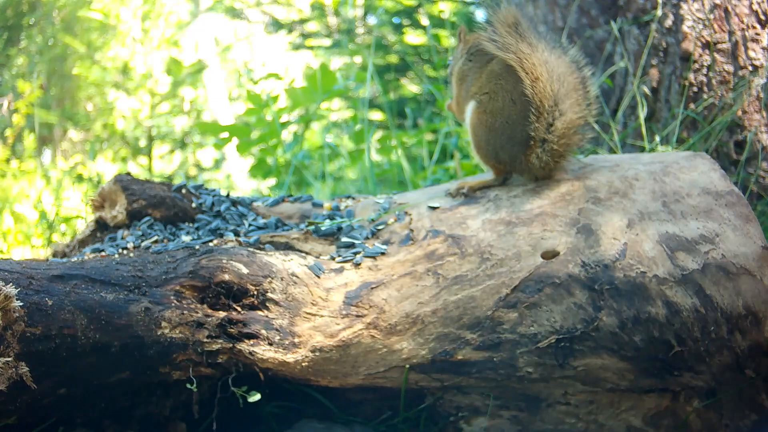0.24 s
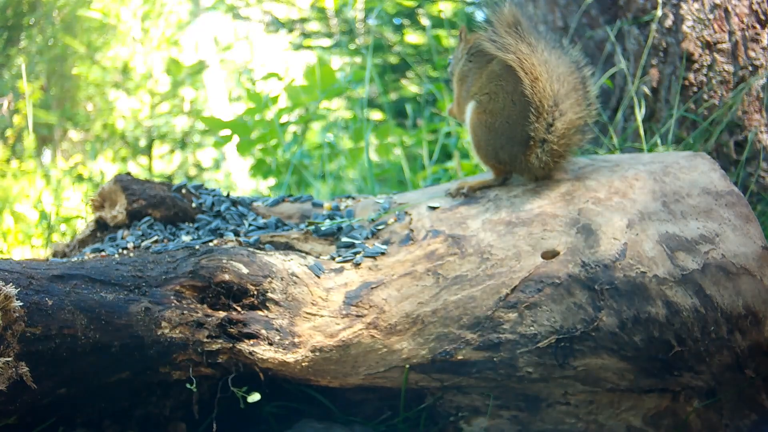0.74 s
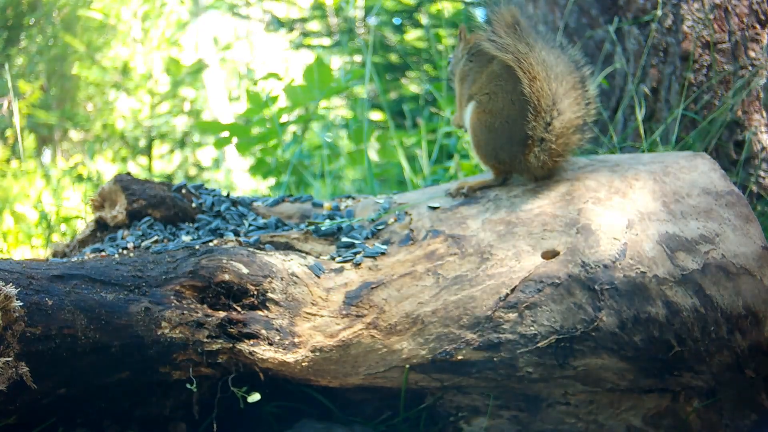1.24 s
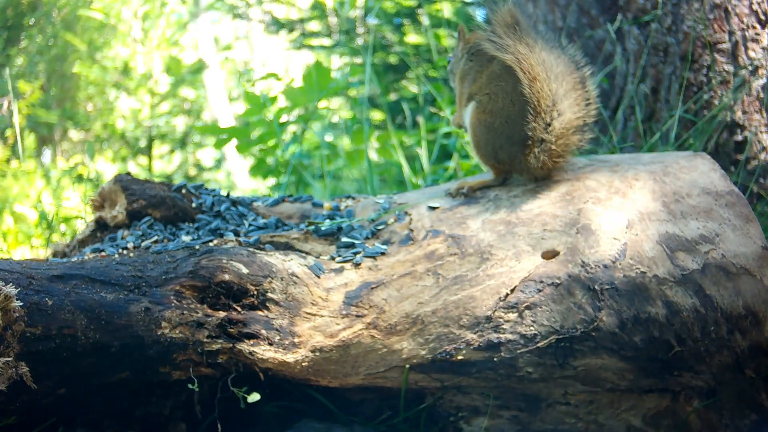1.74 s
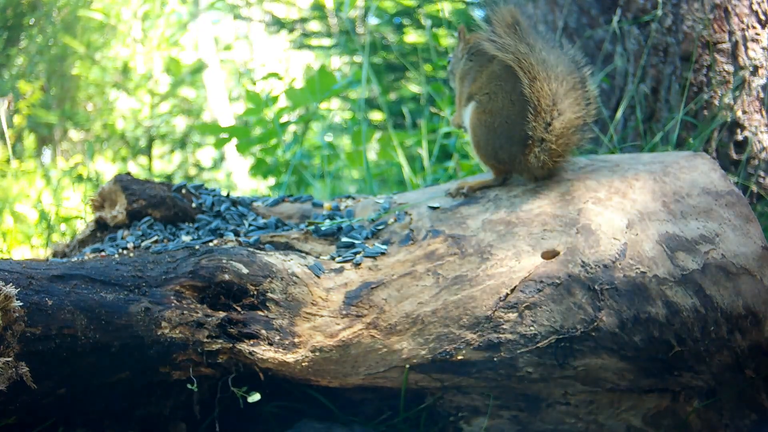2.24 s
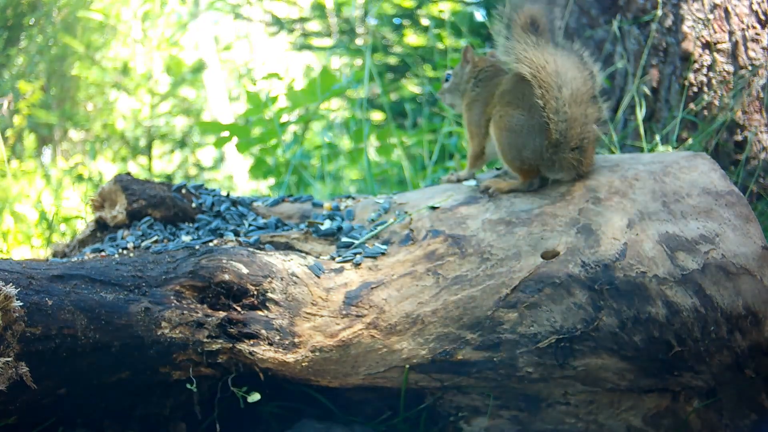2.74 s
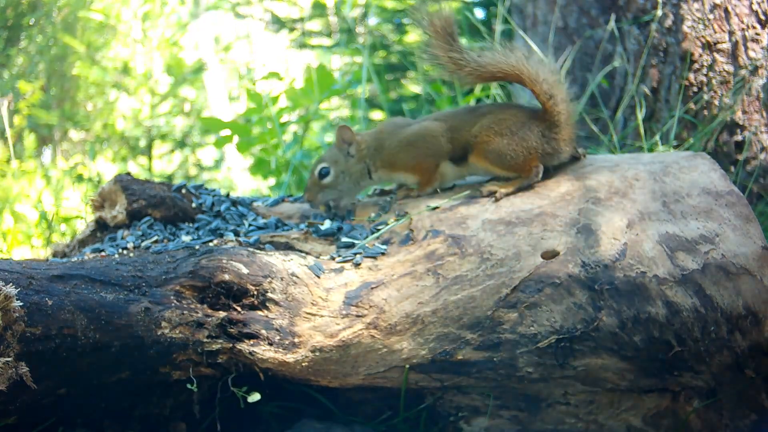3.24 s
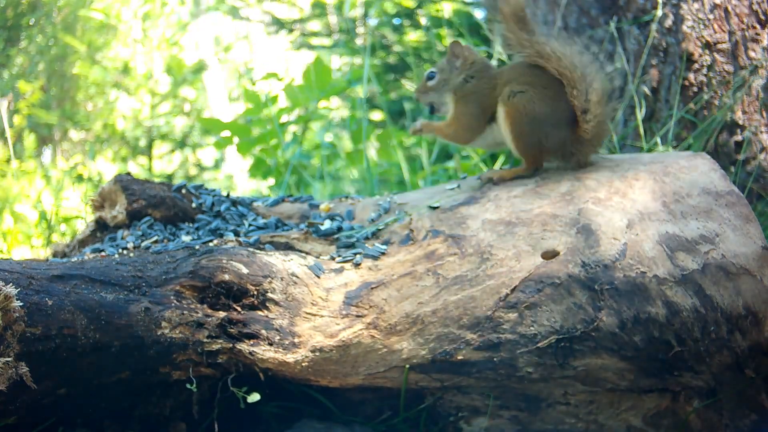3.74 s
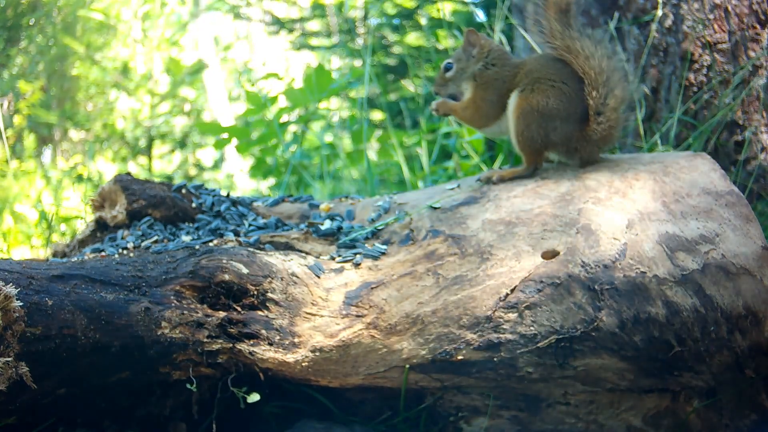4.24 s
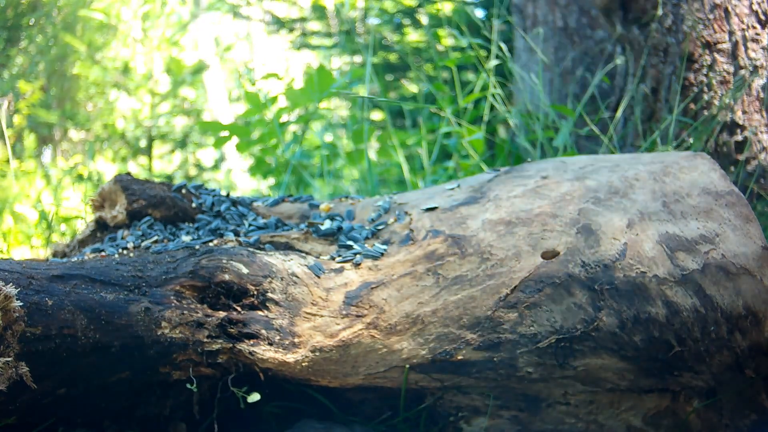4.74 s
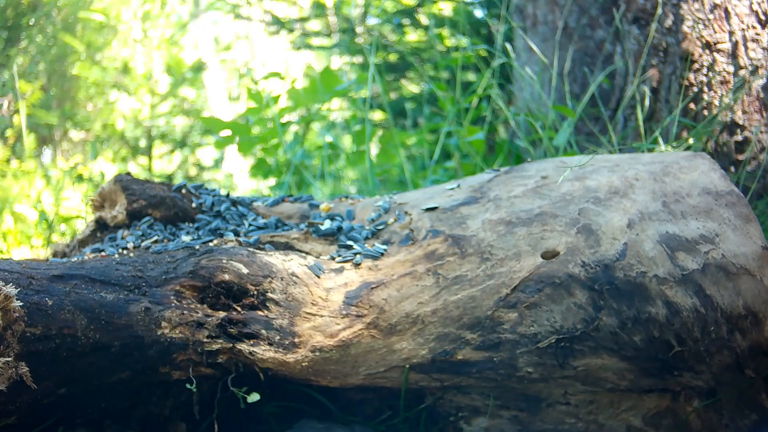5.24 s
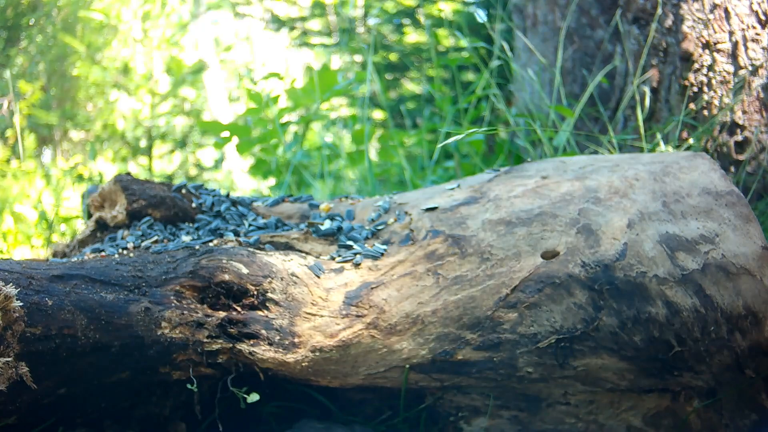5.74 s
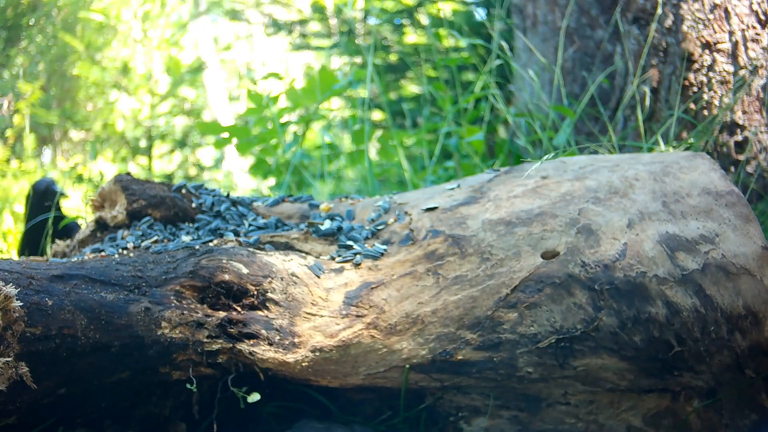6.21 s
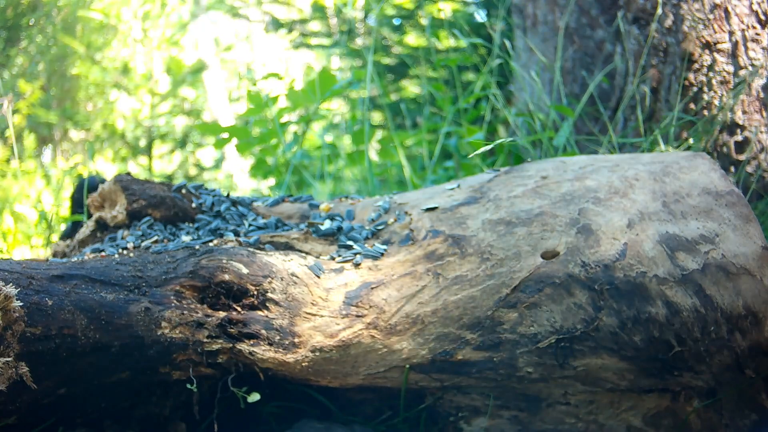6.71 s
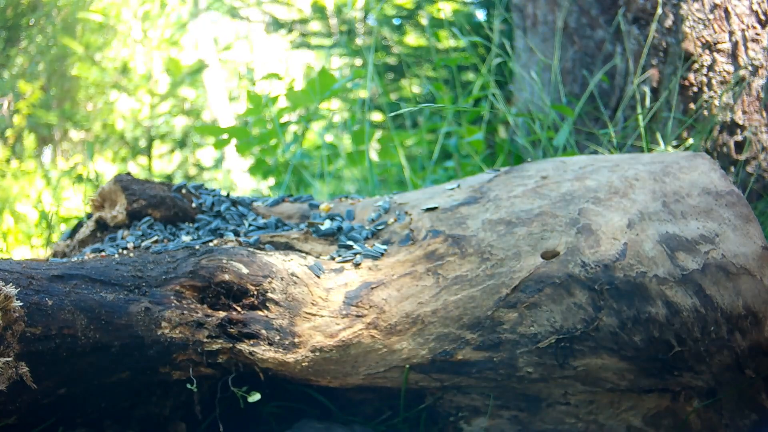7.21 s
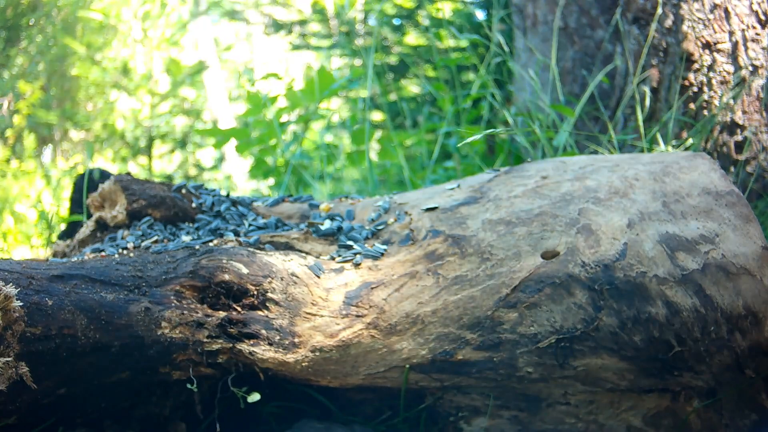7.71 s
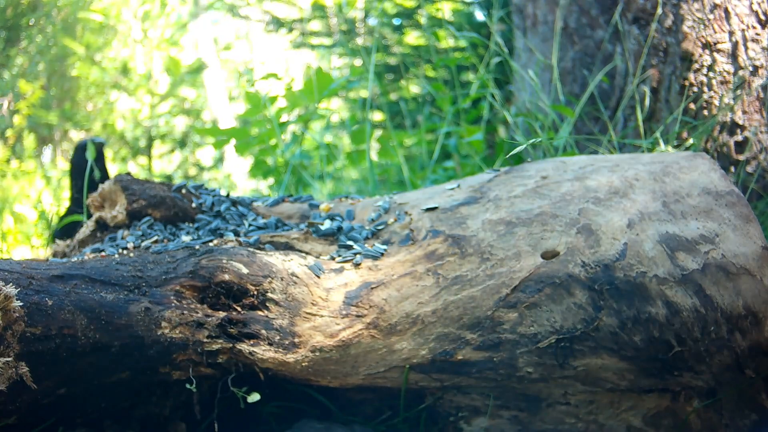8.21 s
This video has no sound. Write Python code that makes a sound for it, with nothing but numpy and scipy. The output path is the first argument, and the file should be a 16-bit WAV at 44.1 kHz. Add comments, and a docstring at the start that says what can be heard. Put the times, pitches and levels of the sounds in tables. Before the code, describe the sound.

A soft, slowly sinking wash of air in a wooded garden. From 0 to 1.8 s thin, very high bird whistles sound deep in the trees, while a young crow begs faintly with whining, arching cries at 0, 0.8 and 1.9 s, echoing in the wood. At 2.5 s a close crow gives a loud, clear, lower caw lasting half a second. Another faint begging cry at 3.0 s and a short rising squeak at 3.2 s lead straight into six harsh, fluttering, raspy caws at about 3.3, 4.1, 4.8, 5.4, 6.2 and 7.2 s, each sagging in pitch, the last softer. Between them, around 4.6 to 6.1 s, small birds peep and chip; husks tick near 4.7 s. A begging cry returns at 6.0 s. Loud peaks crackle at the microphone, with faint tree echo. After 7.7 s only quiet air remains, with one tiny tick at 8.3 s.

```python
"""In a wooded garden with a soft wash of air, small birds call thinly and a young crow begs further off.
Then a crow close by gives a clear caw, a short squeak and six harsh caws, with a faint echo from the trees.
Its voice is a train of pulses from the syrinx, the bird's voice box, shaped by throat, mouth and beak.
The harsh caws flutter about 59 times a second; a second side at half the pitch makes them rasp.
Between them birds peep and chip and seed husks tick; the strongest peaks overload the microphone."""
import sys
import numpy as np
from scipy import signal
from scipy.fft import rfft, irfft
from scipy.io import wavfile
from scipy.ndimage import uniform_filter1d

SR = 44100
rng = np.random.default_rng(int(sys.argv[2]) if len(sys.argv) > 2 else 0)


def dump(signal):
    """Clip the signal to [-1, 1] and save it as 16-bit WAV at the path in sys.argv[1]."""
    limited = np.clip(np.atleast_2d(signal).T, -1, 1)
    pcm = np.round(limited * 32767).astype(np.int16)
    wavfile.write(sys.argv[1], SR, pcm)


N = 373086
TIME = np.arange(N) / SR


def from_db(db):
    """Turn decibels into a gain."""
    return 10 ** (np.asarray(db) / 20)


def rms_one(x):
    """Scale a sound to an average (rms) level of 1."""
    return x / np.sqrt(np.mean(x ** 2) + 1e-20)


def even(x, size=800):
    """Hold the running level near 1, averaging over about size samples."""
    power = uniform_filter1d(uniform_filter1d(x ** 2, size), size // 2)
    return x / np.sqrt(power + 1e-14)


def read(rows, t):
    """Read the columns of a curve at times t, with straight lines between its points."""
    s, *columns = np.transpose(rows)
    return [np.interp(t, s, c) for c in columns]


def span(rows):
    """Sample times from the first row of a curve to its last."""
    return TIME[(TIME >= rows[0][0]) & (TIME <= rows[-1][0])]


def clocks(start, end):
    """A call's sample times, the time since its start, the time left and the share gone by."""
    t = span([(start,), (end,)])
    return t, t - t[0], t[-1] - t, np.linspace(0, 1, len(t))


def add(out, t, x):
    """Mix a sound in at its times, with its ends softened over 2 ms."""
    edge = np.clip(np.minimum(t - t[0], t[-1] - t) / .002, 0, 1)
    out[np.round(t * SR).astype(int)] += x * edge


def drift(rate, t):
    """Wander by chance, heading for a new random value (spread 1) rate times a second."""
    knots = rng.standard_normal(8192)
    return np.interp((t - t[0]) * rate, np.arange(len(knots)), knots)


def colour(x, slope, resonances=()):
    """Filter with a tone curve (Hz, dB) plus resonances (Hz, width Hz, dB), reacting without delay."""
    size = 4096
    hz = np.maximum(np.arange(size // 2 + 1) * SR / size, 1)
    points = np.array(slope)
    db = np.interp(np.log(hz), np.log(points[:, 0]), points[:, 1])
    for centre, width, peak_db in resonances:
        db = db + peak_db / (1 + (2 * (hz - centre) / width) ** 2)
    # folding the cepstrum makes the filter answer as early as it can (minimum phase)
    cepstrum = irfft(np.log(from_db(db)))[:size // 2]
    cepstrum[1:] *= 2
    response = irfft(np.exp(rfft(cepstrum, size)))
    return signal.oaconvolve(x, response)[:len(x)]


def resonate(x, centre_hz, width_hz, lift_db):
    """A gliding resonance lifts the voice around it, moved in short steps."""
    r = np.exp(-np.pi * width_hz / SR)
    state, ringing = np.zeros(2), np.zeros(len(x))
    band = np.array([1, 0, -1]) * (1 - r * r) / 2
    size = 64  # samples per step
    for i in range(0, len(x), size):
        poles = [1, -2 * r * np.cos(2 * np.pi * centre_hz[i] / SR), r * r]
        ringing[i:i + size], state = signal.lfilter(band, poles, x[i:i + size], zi=state)
    return x + (from_db(lift_db) - 1) * ringing


def air():
    """A soft wash of leaves and distance: coloured noise that slowly sinks and wavers a little."""
    # tone of the outdoor air: pitch_hz [Hz], level_db [dB]
    air_tone = [(15, -55), (25, -29.5), (43, -11), (97, -8), (157, -8), (190, -24), (326, -18.5),
                (394, -15), (450, -16), (516, -10.5), (559, -12.5), (1220, -4), (1360, -3.5), (2680, -9.5),
                (16000, -51.5)]
    start_db, sinks_db_per_s, waver_db = -58.2, 0.29, 0.37
    level_db = start_db - sinks_db_per_s * TIME + waver_db * drift(4, TIME)
    return from_db(level_db) * rms_one(colour(rng.standard_normal(N), air_tone))


def trees(x, t60, first_s):
    """Trunks and leaves scatter a grainy tail: it builds over first_s and falls 60 dB in t60 seconds."""
    age = TIME[:SR]
    grains = rng.standard_normal(SR) ** 3  # cubing makes a few grains stand out
    scatter = grains * from_db(-60 * age / t60) * (1 - np.exp(-(age / first_s) ** 2))
    scatter = colour(scatter, [(200, -4.5), (900, -16), (1500, -0.5), (4500, 5), (9000, -9.0)])
    return signal.oaconvolve(x, rms_one(scatter) / np.sqrt(2 * SR))[:N]


def far_trees(x):
    """The longer echo of the wood around a distant bird."""
    return trees(x, t60=0.8, first_s=0.0032)


def husks():
    """Seed husks and claws on bark: each tick is a burst of noise that dies away at once."""
    # ticks: start_s [s], level_db [dB, before the shared gain and the tone curve]
    ticks = [(4.7263, -40), (4.7626, -38), (4.778, -35.5), (8.313, -51)]
    # tone of a tick: pitch_hz [Hz], level_db [dB]
    husk_tone = [(1000, -4), (3000, 11), (6500, -7), (7800, -8), (14000, -17)]
    decay_s, gain_db = 0.0077, -9
    out = np.zeros(N)
    for start, level_db in ticks:
        at, age = round(start * SR), TIME[:SR // 20]
        crackle = rng.standard_normal(len(age)) * np.exp(-age / decay_s)
        out[at:at + len(age)] += from_db(level_db + gain_db) * crackle
    return colour(out, husk_tone)


def whistles(calls, glide, quaver):
    """Gliding pure whistles with a slight quaver, each swelling and fading in one smooth arch."""
    out = np.zeros(N)
    for start, length, pitch_hz, level_db in calls:
        t, _, _, spent = clocks(start, start + length)
        hz = pitch_hz * np.interp(spent, [0, .5, 1], glide) * (1 + quaver * drift(340, t))
        tone = np.sin(2 * np.pi * np.cumsum(hz) / SR)
        add(out, t, from_db(level_db) * 2 * np.sin(np.pi * spent) * tone)
    return out


def small_birds():
    """Whistled notes with an echo: thin high calls deep in the wood, then peeps and chips between caws."""
    # All three: start_s [s], length_s [s], pitch_hz [Hz, before the glide], level_db [dB, before the mix]
    # thin, very high calls
    thin_calls = [(.08, .08, 7950, -73), (.22, .07, 8150, -77), (.315, 0.12, 7940, -71),
                  (.431, .065, 7700, -74), (.77, .11, 8250, -77), (.97, .13, 8250, -75),
                  (1.14, 0.093, 8050, -73), (1.27, 0.094, 8100, -74), (1.7, 0.054, 6900, -74)]
    # rising peeps
    peeps = [(4.605, 0.047, 2630, -50), (4.745, .03, 2770, -52), (5.285, 0.038, 2690, -52.5),
             (6.01, 0.026, 2580, -49)]
    # steep falling chips
    chips = [(4.707, .034, 4600, -54.5), (5.257, 0.03, 4650, -63), (5.4, .024, 4570, -58),
             (5.966, 0.022, 4550, -58), (6.113, 0.024, 4450, -57.5)]
    # a glide gives the pitch at start, middle and end, as shares of the call's pitch
    thin = from_db(-4.5) * whistles(thin_calls, glide=(1, 0.97, .995), quaver=0.019)
    peeping = whistles(peeps, glide=(.945, 0.97, 1.085), quaver=.01)
    chipping = whistles(chips, glide=(1.095, 0.97, 0.73), quaver=.008)
    close = from_db(-3.5) * (peeping + chipping)
    return thin + close + far_trees(from_db(-1) * thin + from_db(-5.5) * close)


def syrinx(t, pitch, flutter, rasp, jitter, hiss, pull, creak_s=.013):
    """One pulse a cycle, fluttering in pitch; a second side at half pitch shifts every other pulse."""
    flutter_hz = 59.4
    # the membranes start with a few slow, separate beats
    pitch = pitch * (1 - .75 * np.exp(-((t - t[0]) / creak_s) ** 4))
    beat = np.cumsum(flutter_hz * (1 + .03 * drift(25, t))) / SR
    swing = flutter * (1 + .12 * drift(60, t)) * np.sin(2 * np.pi * beat)
    cycles = np.cumsum(pitch * (1 + swing + jitter * drift(700, t))) / SR - .1
    # the second side swings once every two cycles, changing pulses in turn in time and strength
    push = rasp * (1 + .25 * drift(250, t)) * np.cos(np.pi * cycles)
    phase = np.maximum.accumulate(cycles + pull * push)
    at = np.flatnonzero(np.diff(np.floor(phase)) > 0)
    late = (np.floor(phase[at + 1]) - phase[at]) / (phase[at + 1] - phase[at])
    strength = 1 + 0.59 * push[at] + 2.7 * swing[at]
    # each pulse falls between samples, so it is spread smoothly over its neighbours
    taps = np.arange(-8, 9)
    offset = taps - late[:, None]
    shape = np.sinc(offset) * np.sinc(offset / len(taps) * 2)
    places = np.clip(at[:, None] + taps, 0, len(t) - 1)
    pulses = np.zeros(len(t))
    np.add.at(pulses, places, strength[:, None] * shape)
    # air hisses through while the membranes are open, most at the top of each flutter
    breath = colour(rng.standard_normal(SR)[:len(t)], [(1500, -8.0), (5000, -12.5)])
    rush = breath * (1 + np.cos(2 * np.pi * phase)) ** 2
    return rms_one(pulses) + hiss * rms_one(rush * np.exp(9 * swing))


def young_crow():
    """Higher, whining cries, each an arch that slides up and falls ever faster, softer at both ends."""
    # cries: start_s [s], end_s [s], top_hz [Hz], fall [share of pitch],
    # first_db and last_db [dB, before the soft ends], echo_db [dB relative to the direct cry]
    cries = [(0.0, 0.379, 728, 0.23, -49.5, -52.5, 1), (0.779, 1.2, 732.5, 0.32, -48.5, -50.5, -1),
             (1.945, 2.187, 669.6, .2, -44, -54.5, -1.5), (3.02, 3.236, 722, .17, -56.5, -40, -3),
             (5.953, 6.211, 717, .08, -54, -44.5, 2.5)]
    # overall tone of the begging voice: pitch_hz [Hz], level_db [dB]
    begging_tone = [(300, -43.5), (680, -17.5), (1100, -7.5), (1450, 9.5), (1950, -0.5), (2500, -14.5),
                    (3600, -16), (5200, -24), (8000, -39), (12000, -51.5)]
    # its throat resonances: centre_hz [Hz], width_hz [Hz], lift_db [dB]
    begging_throat = [(1410, 160, 0), (1990, 48, 19.5), (3304, 240, 9), (3980, 330, 1.5)]
    scoop, scoop_s = .13, .028  # share of pitch, seconds
    edge_db, rise_s, fall_s = 11, .024, 0.043
    direct, scattered = np.zeros(N), np.zeros(N)
    for start, end, top_hz, fall, first_db, last_db, echo_db in cries:
        t, age, left, spent = clocks(start, end)
        pitch = top_hz * (1 - scoop * np.exp(-age / scoop_s) - fall * spent ** 2.7)
        soft_ends_db = edge_db * (np.exp(-age / rise_s) + np.exp(-left / fall_s))
        level_db = first_db + (last_db - first_db) * spent - soft_ends_db
        source = syrinx(t, pitch, flutter=.005, rasp=.3, jitter=.007, hiss=.1, pull=.18)
        cry = from_db(level_db) * even(colour(source, begging_tone, begging_throat))
        add(direct, t, cry)
        add(scattered, t, from_db(echo_db) * cry)
    return direct + far_trees(scattered)


def squeak():
    """A short, smooth, mostly rising note just ahead of the second caw, carried by its second harmonic."""
    # the note: time_s [s], pitch_hz [Hz], level_db [dB, before each overtone's own level]
    squeak_curve = [(3.235, 596, -46), (3.255, 663, -35.5), (3.28, 718, -30.5), (3.3, 714, -28.5),
                    (3.315, 714, -68)]
    # overtones: multiple [times the pitch], level_db [dB]
    squeak_tones = [(1, -27.5), (2, -2), (3, -18), (4, -32)]
    out, t = np.zeros(N), span(squeak_curve)
    pitch, level_db = read(squeak_curve, t)
    phase = 2 * np.pi * np.cumsum(pitch * (1 + .006 * drift(360, t))) / SR
    tones = sum(from_db(level_db + db) * np.sin(k * phase) for k, db in squeak_tones)
    add(out, t, np.sqrt(2) * tones)
    return out


def mouth(source, mouth_hz):
    """The main resonance follows the opening of the mouth."""
    return resonate(source, mouth_hz, width_hz=340, lift_db=7.0)


def throat(source, resonances, level_db, treble_db, mouth_hz):
    """Throat and mouth shape the pulses; the treble above 2500 Hz gets its own level, relative to the rest."""
    # overall tone of a crow's voice: pitch_hz [Hz], level_db [dB]
    voice_tone = [(150, -62.5), (280, -27.5), (450, -13.5), (700, -14), (1000, -8), (1300, -6),
                  (1750, -0.5), (2000, -17), (2450, -22), (5000, -32.5), (6000, -33.5), (8300, -39),
                  (9700, -57.5), (16000, -83)]
    voice = mouth(colour(source, voice_tone, resonances), mouth_hz)
    high_pass = signal.butter(4, 2500, "high", fs=SR, output="sos")
    treble = signal.sosfiltfilt(high_pass, voice)
    return from_db(level_db) * (even(voice - treble) + from_db(treble_db) * even(treble))


def clear_caw():
    """The first caw: steady pulses about an octave below the harsh caws, with no flutter or rasp."""
    # the caw: time_s [s], level_db [dB], treble_db [dB relative to the level], mouth_hz [Hz]
    caw_curve = [(2.463, -31.5, -24.5, 1310), (2.485, -18, -15.5, 1280), (2.557, -12, -19.5, 1446),
                 (2.659, -18.5, -11.5, 1450), (2.749, -20, -13.5, 1333), (2.881, -18, -17.5, 1680),
                 (2.921, -20.5, -12, 1600), (2.985, -27, -20, 1440), (3.0, -49, -19, 1482)]
    # its pitch: time_s [s], pitch_hz [Hz, before a slight waver and the slow first beats]
    pitch_curve = [(2.463, 237), (2.467, 243.8), (2.491, 300), (2.499, 317.7), (2.515, 332.5),
                   (2.559, 334.4), (2.673, 311.5), (2.729, 312.7), (2.777, 305.8), (2.853, 278.2),
                   (2.911, 272.7), (2.951, 253.5), (3.0, 209.5)]
    # its throat resonances: centre_hz [Hz], width_hz [Hz], lift_db [dB]
    clear_throat = [(261, 89, -31.5), (327, 13, 19), (1090, 230, -7), (1337, 91, 5), (1860, 230, -8.5),
                    (2142, 130, 14), (2800, 89, 7), (3750, 190, 13), (3185, 280, 19), (4513, 390, 18.5),
                    (5440, 200, 14.5), (6430, 200, 12.5), (10400, 3100, 14.5)]
    out, t = np.zeros(N), span(caw_curve)
    level_db, treble_db, mouth_hz = read(caw_curve, t)
    pitch = read(pitch_curve, t)[0] * (1 + 0.0035 * drift(41, t))
    source = syrinx(t, pitch, flutter=0, rasp=0, jitter=0.0012, hiss=0.045, pull=0, creak_s=.006)
    add(out, t, throat(source, clear_throat, level_db, treble_db, mouth_hz))
    return out


def harsh_caws():
    """Six hoarse caws, each one push of air: pitch, level, mouth and hoarseness sink as it is spent."""
    # caws: start_s [s], end_s [s], push_s [s], first_hz and last_hz [Hz, before scoop, overshoot and drop],
    # overshoot [share of pitch], drop_s [s], top_db [dB], fade_db [dB],
    # treble_db [dB relative to the level], flutter [share of pitch], rasp [0-1], beak_hz [Hz, at the start]
    caws = [(3.304, 3.905, .59, 627.6, 416.2, .10, .02, -16, 5.5, -17.5, 0.057, 0.12, 3310),
            (4.1, 4.558, .45, 660, 483.3, 0.083, 0.044, -15, 3, -18.5, 0.058, .17, 3190),
            (4.793, 5.159, 0.35, 654.7, 437.8, 0.074, 0.027, -14, 6, -16, 0.075, 0.15, 3180),
            (5.421, 5.945, 0.42, 648, 430.7, .10, .018, -16, 7.5, -17.5, 0.064, 0.1, 3310),
            (6.192, 6.738, .54, 627.4, 439.6, .113, .04, -16, 5, -16, 0.064, 0.09, 3170),
            (7.209, 7.658, .44, 606.4, 424.5, .014, 0.044, -20.5, 6.5, -18.5, 0.045, 0.19, 3820)]
    # throat resonances: centre_hz [Hz], width_hz [Hz], lift_db [dB]
    harsh_throat = [(890, 130, 6), (1322, 150, 7), (2094, 120, 11.5), (3900, 170, -7.5), (4570, 560, 12),
                    (5150, 110, 9.5), (6550, 140, 7)]
    # the pitch scoops up, overshoots and drops as the air runs out (depths as shares of pitch)
    scoop, scoop_s, drop = .286, .063, .365
    overshoot_at_s, overshoot_s = .083, 0.048
    # the level swells, holds for a share of the push and fades; release lasts a share of the final drop
    swell_db, swell_s, full_voice_db = 21, 0.014, -16
    hold, release_db, release_share = 0.47, 19.5, 0.79
    mouth_shut_hz, mouth_open_hz, mouth_opens_s = 1430, 1600, .12
    beak_rest_hz, beak_settles_s = 3156, 0.36
    # extra rasp at the onset; hoarseness lost by the end of the push, as a share
    onset_rasp, onset_rasp_s, hoarseness_loss = 0.17, 0.027, .55
    out = np.zeros(N)
    for (start, end, push_s, first_hz, last_hz, overshoot, drop_s, top_db, fade_db,
         treble_db, flutter, rasp, beak_hz) in caws:
        t, age, left, _ = clocks(start, end)
        spent = np.minimum(age / push_s, 1)

        peak = overshoot * np.exp(-((age - overshoot_at_s) / overshoot_s) ** 2)
        onset = 1 - scoop * np.exp(-age / scoop_s) + peak
        sag_hz = first_hz + (last_hz - first_hz) * spent
        pitch = sag_hz * onset * (1 - drop * np.exp(-left / drop_s))

        # a caw softer than full voice swells more slowly
        attack_s = swell_s * from_db(full_voice_db - top_db)
        swelling_db = swell_db * np.exp(-age / attack_s)
        fading_db = fade_db * np.interp(spent, [hold, 1], [0, 1])
        ending_db = release_db * np.exp(-left / (release_share * drop_s))
        level_db = top_db - swelling_db - fading_db - ending_db

        hoarse = 1 - hoarseness_loss * spent ** 4
        rasping = rasp * hoarse + onset_rasp * np.exp(-age / onset_rasp_s)
        source = syrinx(t, pitch, flutter * hoarse, rasping, jitter=.009 * hoarse, hiss=.2 * hoarse, pull=.2)

        # the bird tunes its windpipe to the third harmonic, but no lower than 1300 Hz
        third_hz = np.maximum(3 * pitch, 1300)
        source = resonate(source, third_hz, width_hz=130, lift_db=4.0)
        beak_now_hz = beak_rest_hz + (beak_hz - beak_rest_hz) * np.exp(-age / beak_settles_s)
        source = resonate(source, beak_now_hz, width_hz=236, lift_db=14.5)
        # the mouth opens early in the caw, then closes as the push is spent
        opening = (1 - np.exp(-(age / mouth_opens_s) ** 2)) * (1 - spent ** 2)
        mouth_hz = mouth_shut_hz + (mouth_open_hz - mouth_shut_hz) * opening
        add(out, t, throat(source, harsh_throat, level_db, treble_db, mouth_hz))
    return out


def scene():
    """The near crow has a quick bounce off log and ground and a faint echo; other birds are further off."""
    background = air() + husks() + small_birds() + young_crow()
    near = squeak() + clear_caw() + harsh_caws()
    near = near + from_db(-16) * trees(near, t60=.025, first_s=.001)
    echo = from_db(-17) * trees(near, t60=0.42, first_s=0.01)
    return (background + near + echo)[None]


def record(dry):
    """The microphone gives way and crackles on one side of strong, sharp peaks; peaks are rounded, top cut."""
    top, squash, crackle, ceiling = 0.3, 0.66, 0.084, 0.5
    cutoff_hz = 15800
    # sharp, treble-rich peaks strain it most; only downward swings past the limit count
    stress = colour(dry[0], [(1500, 0.8), (3200, 9.1)])
    excess = np.maximum(-stress - top, 0)
    give = colour(excess, [(60, -2.0), (330, -2), (3000, -15)])
    sputter = colour(excess * rng.standard_normal(N), [(60, 10.5), (280, 11.5), (1000, -7), (15000, -10.5)])
    rounded = ceiling * np.tanh(dry / ceiling)
    overloaded = rounded + squash * give + crackle * sputter
    low_pass = signal.ellip(10, .1, 80, cutoff_hz, fs=SR, output="sos")
    return signal.sosfilt(low_pass, overloaded)


dry = scene()
out = record(dry)
dump(out)
```